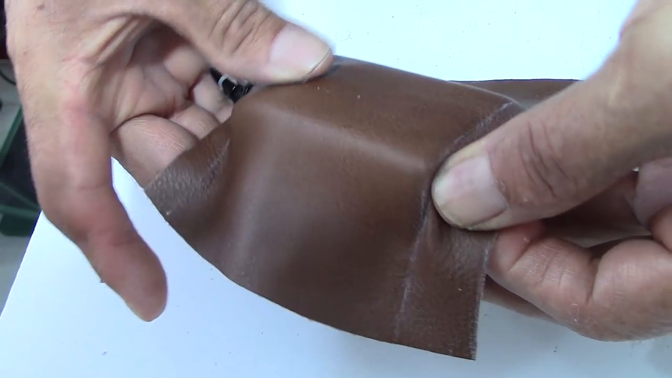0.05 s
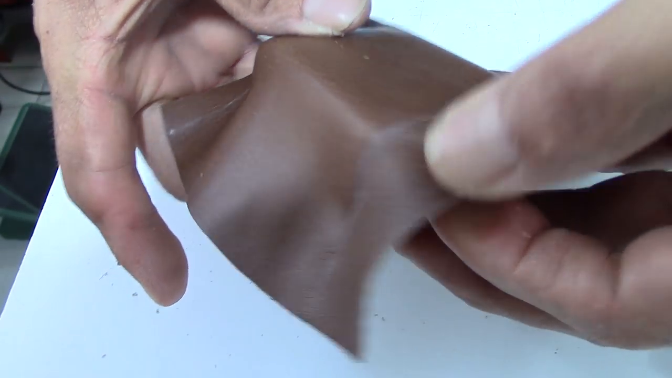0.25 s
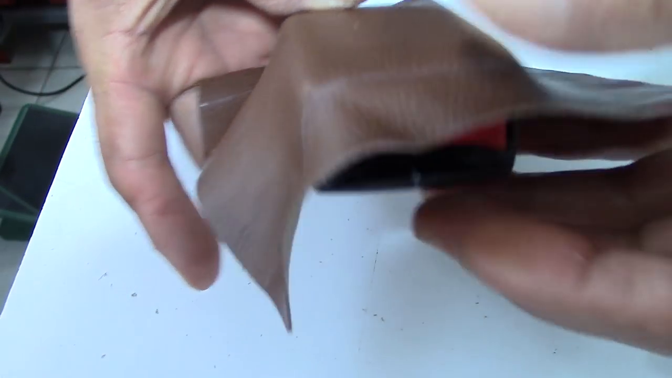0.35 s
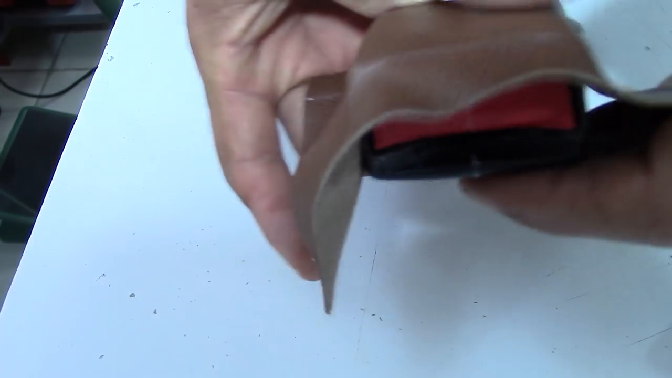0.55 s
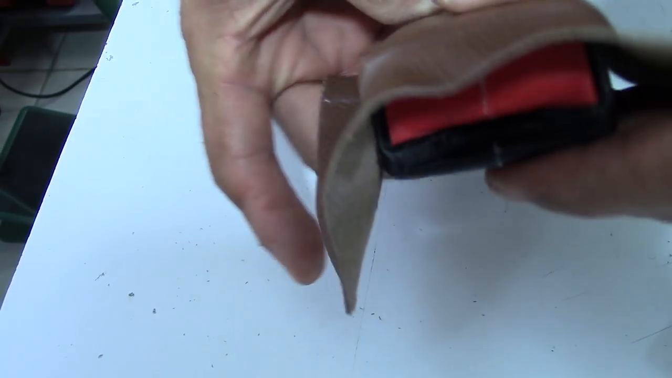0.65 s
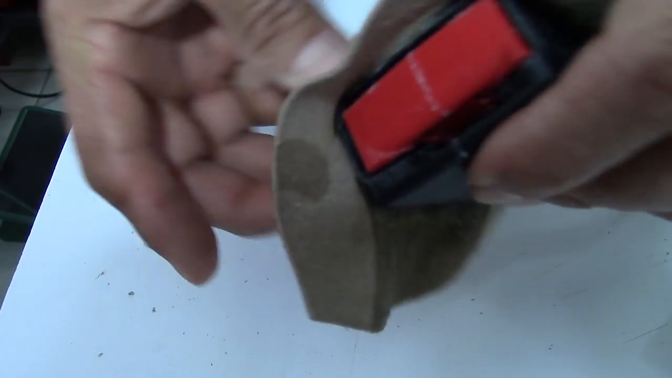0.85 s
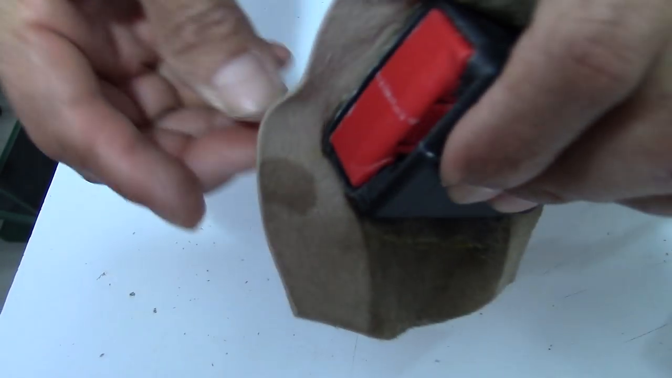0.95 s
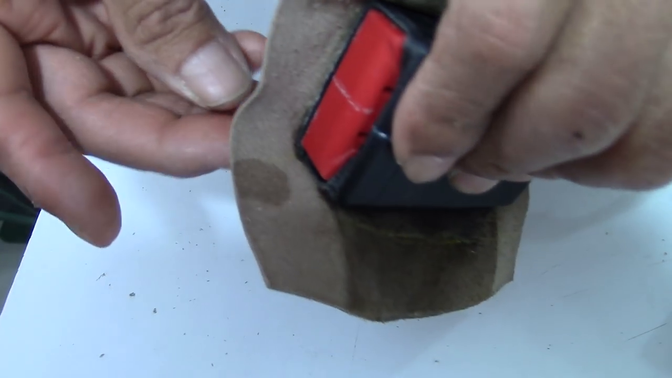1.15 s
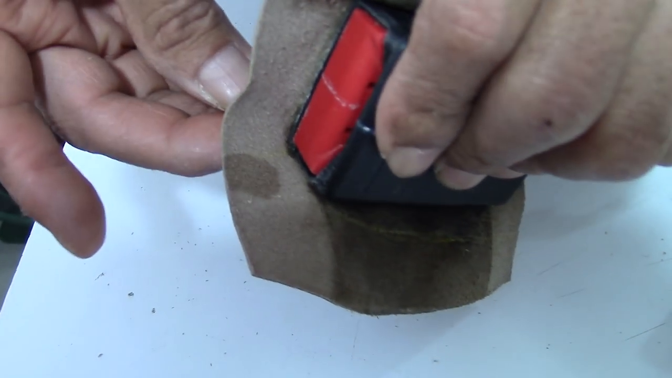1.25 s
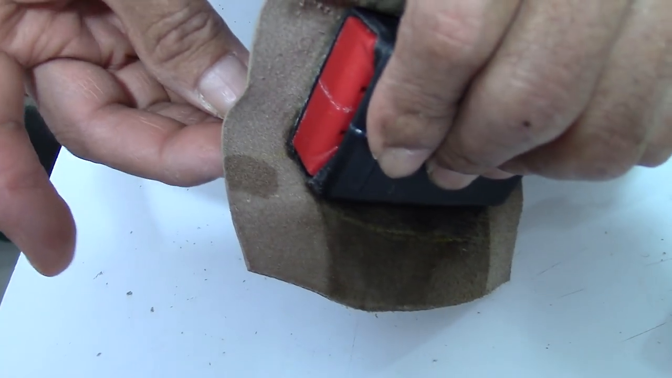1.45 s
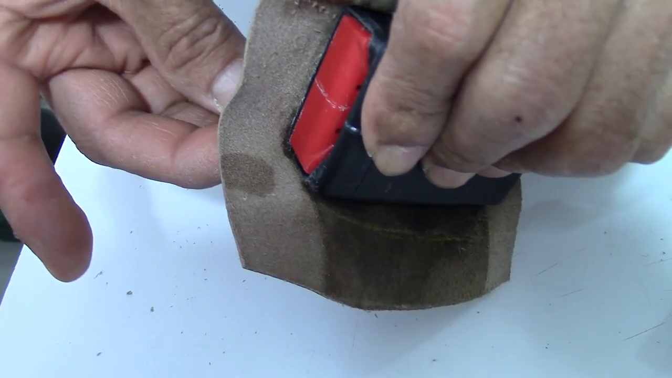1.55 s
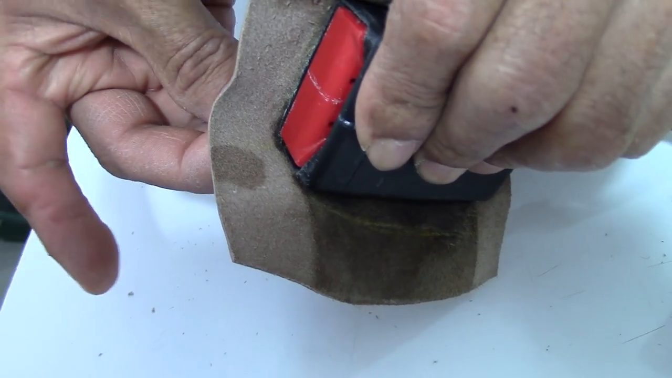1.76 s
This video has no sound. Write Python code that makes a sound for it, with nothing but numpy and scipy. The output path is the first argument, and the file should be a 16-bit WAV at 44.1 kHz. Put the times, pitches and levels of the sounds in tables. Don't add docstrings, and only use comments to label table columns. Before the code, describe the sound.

Glued leather on a small hollow box rubs and drags, one hard knock, then faint room hum.

```python
import sys
import numpy as np
from scipy import signal
from scipy.fft import rfft, irfft, next_fast_len
from scipy.io import wavfile
from scipy.ndimage import uniform_filter1d, map_coordinates

SR = 44100
rng = np.random.default_rng(int(sys.argv[2]) if len(sys.argv) > 2 else 0)


def gain_from_db(level_db):
    decades = np.asarray(level_db, float) / 20
    return 10 ** decades


def inscribe(sig):
    pcm = np.round(np.clip(np.atleast_2d(sig).T, -1, 1) * 32767)
    wavfile.write(sys.argv[1], SR, pcm.astype(np.int16))


N = 81585

# time in seconds, pressure in dB,
# brightness from speed in dB, weight on the hollow in dB.
DRAGS = [
    [(0, -56, 5, -9), (.035, -51, 6, 6.5), (.075, -41.5, -7, 11), (.097, -47.5, -3, 13.5),
     (.13, -37, -3.5, 4), (.165, -33, -15, 1.5), (.18, -52.5, -11, 14.5), (.224, -51.5, -21, 11)],
    [(.229, -26, 8, 0), (.25, -24.5, -2, -0.5), (.29, -21.5, -3.5, -3), (.325, -23, 4.5, 1.5),
     (.36, -18.5, -2, -1.5), (.39, -23, -2, -0.5), (.412, -28, 0, -7.5), (.46, -54.5, -27, 20)],
    [(.606, -19, 0, -2.5), (.628, -24.5, -6, 0.5), (.65, -25, -26, 0.5), (.68, -22, -6, -2.5),
     (.7, -24, 2, 6.5), (.718, -22, 3.5, 1.5), (.75, -31, -1, 5.5), (.77, -42.5, 4, 1),
     (.83, -61, -6, 11.5)],
]
DRAG_GRIP = [(3, -7.5, 0.5), (1, -1, -1.5), (-3.5, 0.5, 2.5)]
DRAG_GRIT_DB = [-3, -0.5, -6]
# frequency in Hz, width in Hz, level in dB.
HOLLOW = [(251.3, 21.7, 0), (323, 22.7, 1.5), (382, 21, 0.5)]
# frequency in Hz, width in Hz, level in dB.
LID = [(516, 36.4, -3.5), (570, 72, -12), (697.3, 25.4, -2), (782, 108, -10), (910.5, 43, -5.5),
       (1071, 40, -7.5)]
# frequency in Hz, width in Hz, level in dB.
WALLS = [(1218, 86, -11), (1435, 52, -13), (1588, 54, -11), (1870, 76, -11), (2470, 360, -19.5),
         (3000, 108, -18), (3210, 330, -26)]
# frequency in Hz, width in Hz, level in dB.
GRIT = [(5500, 1030, -33.5), (6570, 1400, -37), (6750, 1150, -36), (8600, 3500, -38.5), (9200, 670, -52),
        (13000, 5000, -56)]
KNOCK_S = [.2271, .3643, .6019, .6203, .2925, .3135, .3485, .3525, .6775, .7115, .3238]
# peak in dB, hardness in dB.
KNOCKS = [(-16, -8), (-17, -18), (-3, -0.5), (-18, -24), (-20, -16), (-26, -11), (-20, -14), (-23.5, -15),
          (-13, -6), (-15, -6), (-17, 5)]
# frequency in Hz, level in dB, 60 dB decay time in seconds.
STRUCK = [(250.3, -7.5, 0.13), (321.8, -7.5, 0.11), (396, -0.5, 0.024), (586, -1.5, 0.028),
          (692, -4, 0.044), (873, 2.5, 0.0084), (1325, -6.5, 0.031), (1553, -9, 0.078), (1890, -36, 0.061),
          (2818, -4.5, 0.019), (3280, -11, 0.029)]
# time in seconds, level in dB, frequency in Hz.
JOLTS = [(.2271, -20.5, 1040), (.3641, -13, 940), (.1305, -33.5, 840), (0.19, -29.5, 660)]
# start in seconds, length in seconds, centre in Hz, width in Hz.
RUBS = [(.028, .12, 9000, 4000), (.14, .07, 9000, 5000), (.55, .025, 6000, 3000), (.81, .045, 1800, 2500),
        (.985, .085, 1500, 1500), (1.53, .05, 4300, 1500), (1.64, .1, 6600, 2000), (.03, .07, 2600, 300),
        (.325, .08, 2500, 220), (.3, .04, 8200, 1500), (.675, .04, 6500, 2500), (.76, .1, 11500, 6000),
        (.86, .2, 7000, 8000), (.17, .055, 3500, 4000), (.03, .15, 2100, 300), (.335, .07, 3500, 300),
        (.665, .09, 1800, 350), (.06, .115, 378, 30), (.9, .09, 1600, 2000), (.25, .05, 5400, 700),
        (.1, .075, 520, 50), (.665, .085, 700, 50), (.67, .085, 11000, 6000), (.34, .07, 9900, 900),
        (.355, .055, 7300, 900), (.33, .08, 12000, 1500), (.3, .09, 5300, 800), (.06, .06, 770, 60),
        (.14, .04, 1290, 60), (.5, .09, 285, 40), (.238, .03, 9300, 1500), (.61, .06, 3000, 700),
        (.73, .024, 7500, 4000), (.135, .04, 1500, 2500)]
RUB_DB = [-46.5, -54.5, -56.5, -55.5, -66, -73, -70, -54.5, -33.5, -56, -45.5, -59.5, -68.5, -60, -60, -42,
          -42, -43.5, -64.5, -53.5, -46.5, -31.5, -52, -55.5, -53, -62, -46, -51, -59, -65, -51.5, -44,
          -54.5, -45]
# start in seconds, length in seconds, centre in Hz, width in Hz.
TICKS = [(.566, .006, 2000, 900), (.5952, .006, 2200, 1500), (.5952, .006, 6500, 6000),
         (.405, .008, 7200, 500), (.229, .007, 6000, 600), (.229, .006, 7200, 600),
         (.569, .005, 7000, 1500), (.551, .014, 8000, 9000), (.821, .012, 7500, 7000),
         (.166, .006, 5400, 900), (.5952, .004, 11500, 5000), (.602, .005, 6500, 5000),
         (.404, .005, 9000, 7000), (.41, .004, 8000, 6000), (.715, .003, 12000, 5000),
         (.323, .004, 10000, 9000), (.559, .006, 8500, 3000)]
TICK_DB = [-51, -42, -53, -45.5, -42.5, -47, -56, -54.5, -54.5, -68, -49, -33, -48, -56, -53, -46, -59]
# start in seconds, length in seconds, centre in Hz, width in Hz.
GROANS = [(.08, .2, 140, 20), (.61, .07, 130, 14), (.7, .3, 80, 60), (.23, .07, 70, 40), (.8, .06, 80, 30)]
GROAN_DB = [-58.5, -52, -84, -72, -76]
# frequency in Hz, level in dB, 60 dB decay time in seconds.
TAP = [(1430, -1, 0.017), (2180, -0.5, .017), (1900, 0, .012)]
# frequency in Hz, side over mid in dB.
APART = [(30, -14), (125, -44), (250, -52), (500, -33), (1500, -25), (3000, -20), (6000, -17), (11000, -22)]
# frequency in Hz, 60 dB decay time in seconds.
ROOM = [(150, 0.47), (400, 0.28), (1500, 0.36), (4000, 0.34), (10000, 0.26)]
# frequency in Hz, level in dB per Hz.
AIR = [(15, -52), (25, -46), (149, -6.5), (300, -2.5), (695, -8), (1070, -10.5), (6500, -23),
       (15000, -33.5)]
# frequency in Hz, side over mid in dB.
AIR_APART = [(30, -6), (125, -13), (500, -6.5), (1500, -7.5), (3000, -9.5), (6000, -10), (11000, -9)]
# frequency in Hz, rms level in dB.
HUM = [(709, -72.5), (500, -78.5)]


def drags():
    t = np.arange(N) / SR
    press, bright, weight = np.zeros((3, N))
    grip, gritty = np.zeros((3, N)), np.zeros(N)
    for rows, favour_db, grit_db in zip(DRAGS, DRAG_GRIP, DRAG_GRIT_DB):
        s, press_db, bright_db, weight_db = np.transpose(rows)
        on = (t >= s[0]) & (t < s[-1])
        press += on * gain_from_db(np.interp(t, s, press_db))
        bright += on * np.interp(t, s, bright_db)
        weight += on * np.interp(t, s, weight_db)
        gritty += on * grit_db
        grip += on * np.array(favour_db)[:, None]

    force = gain_from_db(1.1 * wobble(60.67)) * slips()
    clumps = gain_from_db(19.5 + 1.4 * wobble(220))
    press = clumps * uniform_filter1d(press, size=60)
    drift_db, walls_follow_speed = 1.44, 0.44
    hollow = 0
    for k, mode in enumerate(HOLLOW):
        hollow = hollow + (-1) ** k * ringing(force, gain_from_db(weight + grip[k]), [mode], drift_db)
    lid = ringing(force, 0.96, LID, drift_db)
    walls = ringing(force, gain_from_db(walls_follow_speed * bright), WALLS, drift_db)
    rasp = evened(hollow - lid, 1 + gain_from_db(weight))
    body = low_pass(press * (rasp + walls), 3600)
    grit = ringing(slips(), press * gain_from_db(bright + gritty), GRIT, drift_db=2.5)
    return body + low_pass(grit, 12400)


def slips():
    slips_per_s, spread_db, smooth_share = 700, 3, 0.6
    hit, size, hiss = rng.random(N), rng.exponential(size=N), rng.standard_normal(N)
    grains = (hit < slips_per_s / SR) * gain_from_db(spread_db * np.minimum(size, 3))
    rough = unit(grains - grains.mean())
    return np.sqrt(1 - smooth_share) * rough + np.sqrt(smooth_share) * hiss


def ringing(x, level, modes, drift_db):
    steady_s, steady_share = 0.03, 0.7
    out = 0
    for k, (hz, wide, db) in enumerate(modes):
        y = filtered(x, lambda f: 1j * f * wide / (hz * hz - f * f + 1j * f * wide))
        swing = np.abs(uniform_filter1d(y ** 2, size=round(steady_s * SR))) / np.mean(y ** 2) + 0.049
        drift = gain_from_db(db + drift_db * wobble(24.5))
        out = out + (-1) ** k * drift * y / swing ** (steady_share / 2)
    return out * level


def evened(x, level):
    even_s, even_share = 0.012, 0.6

    def power(v):
        return np.abs(uniform_filter1d(v ** 2, size=round(even_s * SR))) + 1e-14

    swing = power(x) / power(level)
    usual = np.median(swing[level > 1e-6])
    return x * (usual / (swing + 1e-9)) ** (even_share / 2)


def knocks():
    struck_db, crack_db, crack_t60_s, crack_hz = -7.5, -6, 0.0067, 5200
    out, crack, t = np.zeros(N), np.zeros(N), np.arange(SR // 5) / SR
    for s, (db, hard_db) in zip(KNOCK_S, KNOCKS):
        ring = 0
        for hz, level_db, t60 in STRUCK:
            decay = gain_from_db(level_db + hard_db * hz / 2000 - 60 * t / t60)
            ring = ring + decay * np.sin(2 * np.pi * hz * t)
        start = round(s * SR)
        out[start:][:len(t)] += gain_from_db(db + struck_db) * ring
        burst = np.sign(rng.standard_normal(len(t)))
        crack[start:][:len(t)] += gain_from_db(db + hard_db + crack_db - 60 * t / crack_t60_s) * burst
    return out + filtered(crack, lambda f: 1j * f / (2500 + 1j * f) / (1 + 1j * f / crack_hz) ** 2)


def jolts():
    t60_s, out = 0.009, np.zeros(N)
    for s, db, hz in JOLTS:
        since = np.clip(np.arange(N) / SR - s, 0, None)
        out += gain_from_db(db - 60 * since / t60_s) * 2 * np.sin(2 * np.pi * hz * since)
    return out


def box():
    def low_cut(x, hz):
        return filtered(x, lambda f: (-f * f / (hz ** 2 - f * f + 1.2j * f * hz)) ** 3)

    return low_cut(drags(), 193.5) + low_cut(knocks() + jolts(), 214.5)


def fingers():
    rubs = strokes(RUBS, RUB_DB, patchy_db=1)
    ticks = strokes(TICKS, TICK_DB, patchy_db=0, fade_db=-28)
    groans = strokes(GROANS, GROAN_DB, patchy_db=0)
    return rubs + ticks + groans + tap()


def strokes(rows, levels_db, patchy_db, fade_db=0):
    t, out = np.arange(N) / SR, np.zeros(N)
    for (s, long, hz, wide), db in zip(rows, levels_db):
        edge_s = min(0.036, long / 8)
        shape = np.clip(np.minimum(t - s, s + long - t) / edge_s, 0, 1)
        shape = shape * gain_from_db(fade_db * np.clip((t - s) / long, 0, 1))
        band = filtered(slips(), lambda f: (1j * f * wide / (hz * hz - f * f + 1j * f * wide)) ** 2)
        band = shape * band
        rms = np.sqrt(np.sum(band ** 2) / (long * SR))
        out += gain_from_db(db + patchy_db * wobble(52.2)) * band / rms
    return out


def tap():
    start_s, tap_db, rise_s = 0.5508, -29, 0.00042
    t = np.clip(np.arange(N) / SR - start_s, 0, None)
    out = np.zeros(N)
    for hz, db, t60 in TAP:
        out += gain_from_db(tap_db + db - 60 * t / t60) * np.sin(2 * np.pi * hz * t) * (1 - np.exp(-t / rise_s))
    return out


def room(x):
    hz, t, z = signal.stft(rng.standard_normal((2, SR)), SR, nperseg=256)
    fade = gain_from_db(-60 * t / along(ROOM, hz)[:, None])
    tail = signal.istft(z * fade, SR, nperseg=256)[1]
    late = np.pad(x, (300, 0))
    return signal.fftconvolve(late[None], tail / np.linalg.norm(tail[0]), axes=1)[:, :N]


def air():
    air_db, right_lean = -61, 0.037
    mid, side = [unit(filtered(rng.standard_normal(N), lambda f: gain_from_db(along(AIR, f)))) for _ in range(2)]
    side = filtered(side, lambda f: gain_from_db(along(AIR_APART, f))) - right_lean * mid
    t, hum = np.arange(N) / SR, np.zeros(N)
    for hz, db in HUM:
        swell = np.sqrt(2) * gain_from_db(db + 0.85 * wobble(8.7))
        hum += swell * np.sin(2 * np.pi * hz * t + 0.46 * wobble(9.73))
    breath = gain_from_db(air_db + 0.15 * wobble(3.56))
    return breath * np.array([mid, side]) + [hum, 0 * hum]


def unit(x):
    return x / np.sqrt(np.mean(x ** 2) + 1e-20)


def along(points, hz):
    f, v = np.transpose(points)
    return np.interp(np.log(hz + 1), np.log(f + 1), v)


def wobble(rate):
    knots = rng.standard_normal(int(N * rate / SR) + 4)
    return map_coordinates(knots, [np.arange(N) * rate / SR])


def filtered(x, response):
    m = next_fast_len(N + SR // 2)
    return irfft(rfft(x, m) * response(np.fft.rfftfreq(m, 1 / SR)), m)[..., :N]


def low_pass(x, hz):
    return filtered(x, lambda f: hz ** 2 / (hz ** 2 - f * f + 1j * f * hz))


def scene():
    mic_roll_hz, room_db, room_side_db = 10630, -11.5, 6
    near = filtered(box() + fingers(), lambda f: 1 / (1 + 1j * f / mic_roll_hz) ** 3)
    wet = gain_from_db(room_db) * room(near)
    spread = np.roll(near, 9) + gain_from_db(room_side_db) * wet[1]
    side = filtered(spread, lambda f: gain_from_db(along(APART, f)))
    mid, side = air() + [near + wet[0], side]
    return np.array([mid + side, mid - side])


def roll_off(x):
    return signal.sosfilt(signal.butter(12, 16470, fs=SR, output="sos"), x)


def record(dry):
    top_hz = 15800
    mix = filtered(dry, lambda f: f < top_hz)
    return roll_off(mix)


dry = scene()
out = record(dry)
inscribe(out)
```